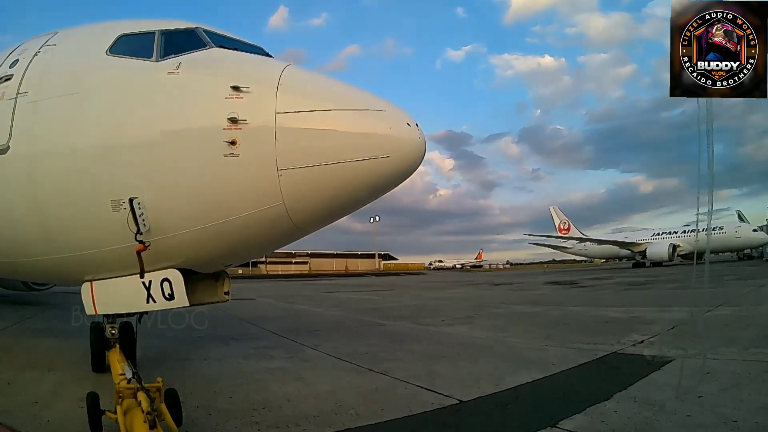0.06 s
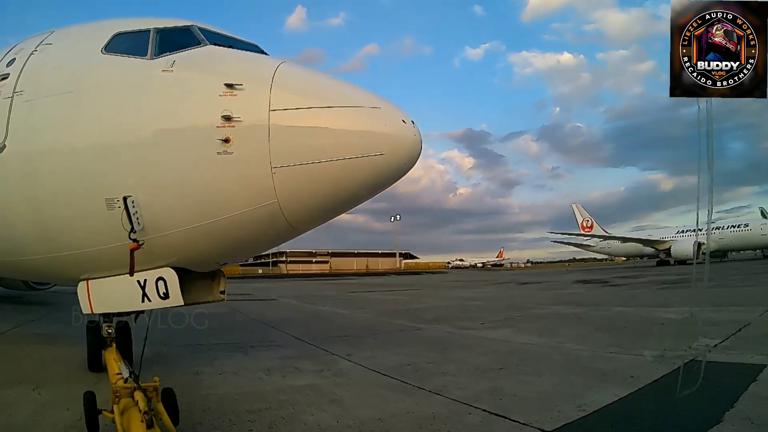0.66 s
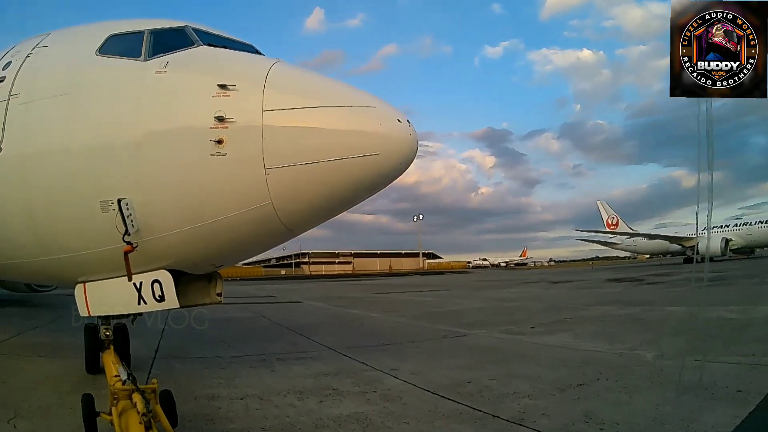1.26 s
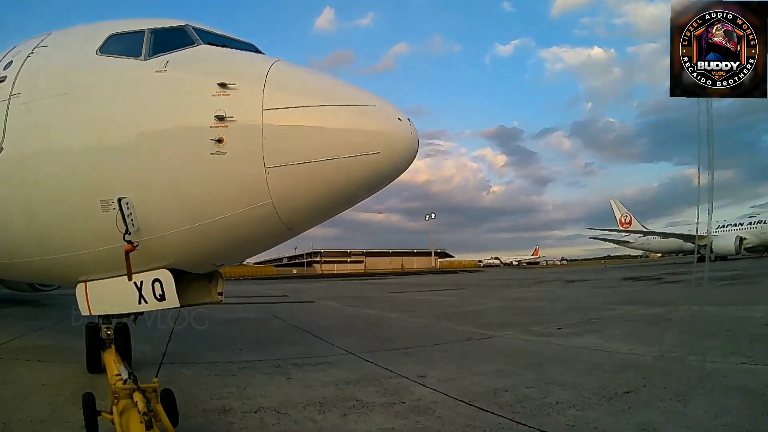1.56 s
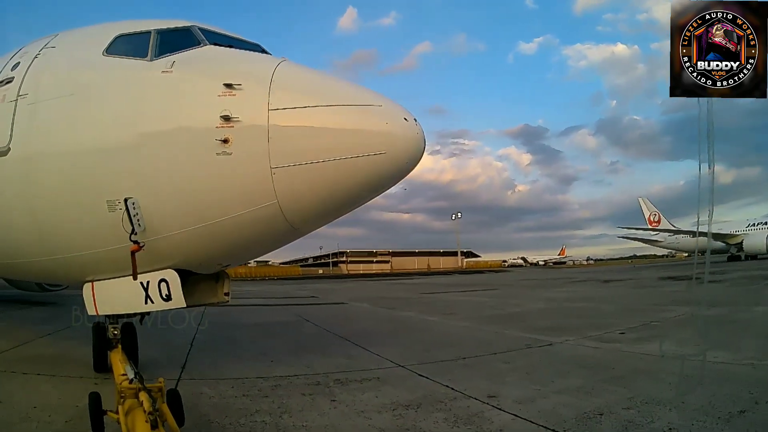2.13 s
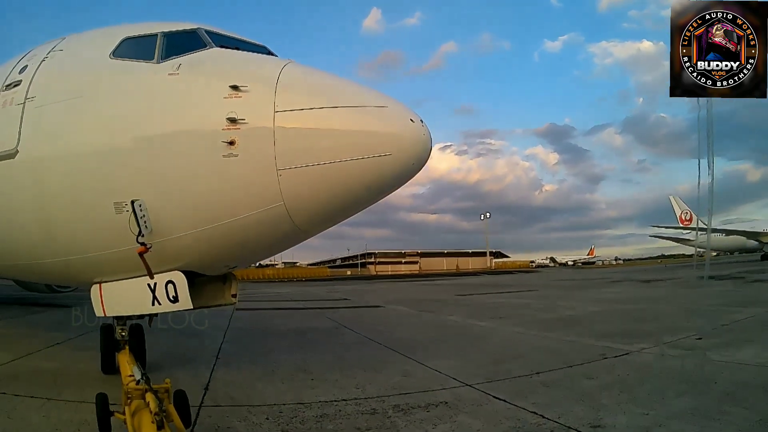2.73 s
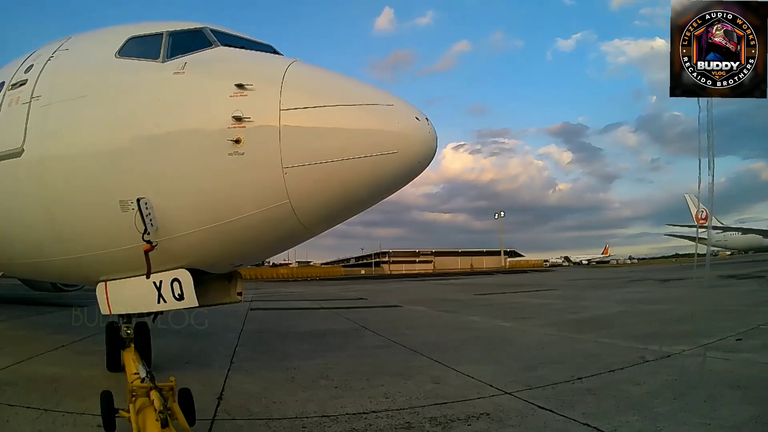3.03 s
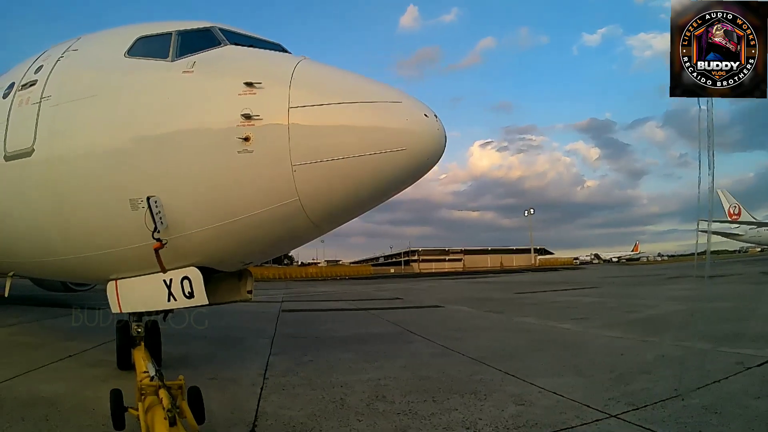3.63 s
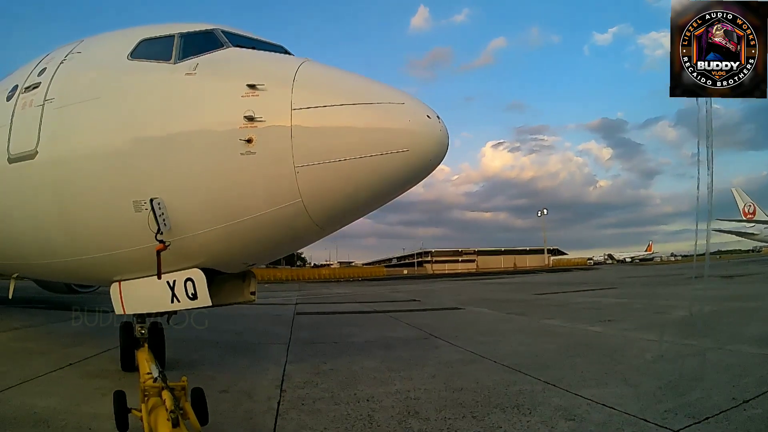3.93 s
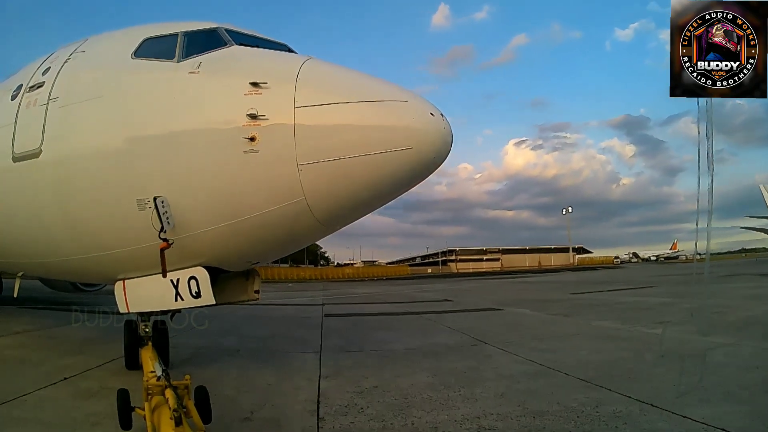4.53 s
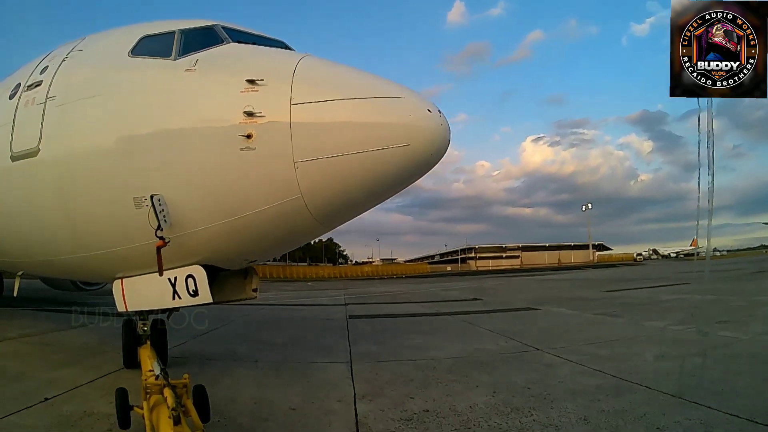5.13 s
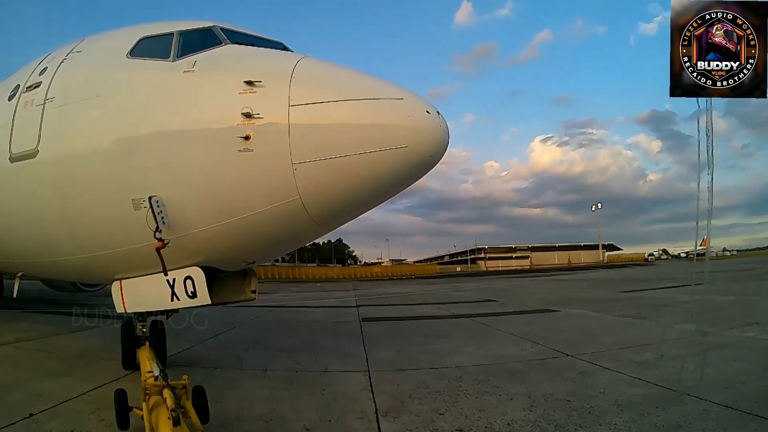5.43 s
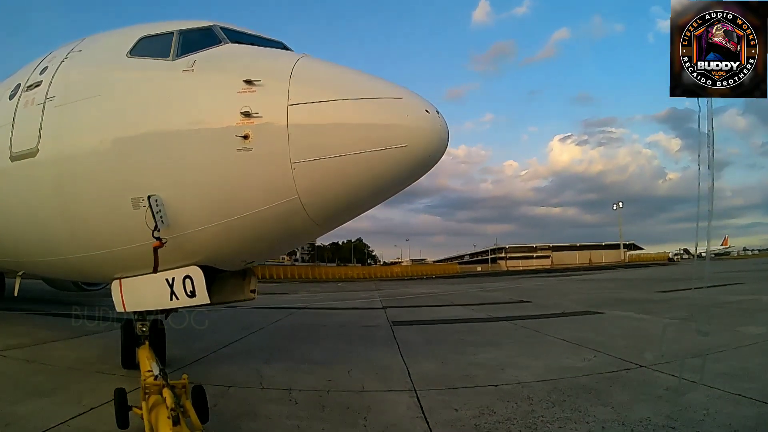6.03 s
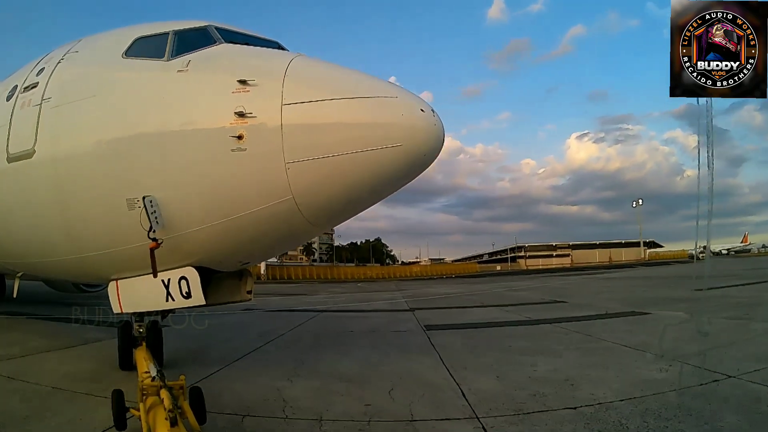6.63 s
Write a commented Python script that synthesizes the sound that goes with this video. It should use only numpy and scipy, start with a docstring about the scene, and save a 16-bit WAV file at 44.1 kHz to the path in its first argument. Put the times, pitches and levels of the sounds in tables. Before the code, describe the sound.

Heard from aboard a tug pushing back an airliner outdoors, a constant, slightly buzzing pump hum rides over a low diesel drone and engine rattle. The towbar gives one short squeak early on, then several soft hydraulic hisses come and go around the middle. The rolling rumble swells briefly now and then, while an even rush of airport noise and a faint, thin turbine whine continue throughout.

```python
"""On an airport apron, a diesel tug pushes an airliner back with a towbar, heard from the tug itself.
The engine's firings drone and rattle its block, the pump's pistons hum on a wavering pitch, and the
heavy frame rocks and rumbles. Oil hisses through the steering valve in short spells, and the towbar
squeals once as its joint slips. Behind it all, a turbine whines thinly over a broad wash of noise."""
import sys
import numpy as np
from scipy import signal
from scipy.fft import rfft, irfft
from scipy.io import wavfile
from scipy.ndimage import uniform_filter1d

SR = 44100
rng = np.random.default_rng(int(sys.argv[2]) if len(sys.argv) > 2 else 0)


def wav_out(sig):
    """Save sig, one row per channel (or a flat mono array), as 16-bit PCM at SR to the path in sys.argv[1]."""
    wavfile.write(sys.argv[1], SR, np.round(np.clip(np.atleast_2d(sig).T, -1, 1) * 32767).astype(np.int16))


N = 298538
TIME = np.arange(N) / SR
HZ = np.maximum(np.arange(N // 2 + 1) * SR / N, 1e-3)  # the frequencies of a spectrum


def undb(db):
    """Turn decibels into a number to multiply by."""
    return 10 ** (np.asarray(db) / 20)


def level(x, db):
    """Set a sound's average (rms) level."""
    return x * undb(db) / np.sqrt(np.mean(x ** 2))


def curves(table):
    """Join each column's points by straight lines over time."""
    times, *columns = np.transpose(table)
    return [np.interp(TIME, times, column) for column in columns]


def noise():
    """White noise, an even hiss."""
    return rng.standard_normal(N)


def wander(rate):
    """A random wobble of typical size 1, changing about rate times a second."""
    return level(irfft(rfft(noise()) / (1 + (HZ / rate) ** 4), N), 0)


def ring(x, modes):
    """Make a sound ring in narrow bands: (pitch [Hz], width [Hz], gain [dB])."""
    power = sum(undb(db) ** 2 / (1 + ((HZ ** 2 - hz ** 2) / (1.27 * HZ * width)) ** 2) ** 2
                for hz, width, db in modes)
    return irfft(rfft(x) * np.sqrt(power), N)


def colour(x, points):
    """Shape a sound by (frequency [Hz], gain [dB]) points, fading out below the first."""
    hz, db = np.transpose(points)
    gain = undb(np.interp(np.log(HZ), np.log(hz), db)) / (1 + (hz[0] / HZ) ** 4)
    return irfft(rfft(x) * gain, N)


def count_cycles(hz):
    """Count the cycles of a changing pitch, from a random start."""
    return np.cumsum(hz) / SR + rng.random()


def tone(cycles, db):
    """A pure tone at an average (rms) level."""
    return np.sqrt(2) * undb(db) * np.sin(2 * np.pi * cycles)


def spell(start, end, rise, fall):
    """Fade in around start and out around end, all in seconds."""
    return np.clip(.5 + (TIME - start) / rise, 0, 1) * np.clip(.5 + (end - TIME) / fall, 0, 1)


def engine(firing_hz=67.1, knock_depth=0.16, flutter_db=0.8, drift_db=0.5):
    """Firings make a low drone and rattle the engine block, while the cab and exhaust boom."""
    # tones of the drone: (multiple of the firing rate, level [dB])
    harmonics = [(1, -45), (2, -53)]
    # ringing of the block and its covers: (pitch [Hz], width [Hz], relative level [dB])
    block_modes = [(733.4, 25.4, 5.5), (835, 19, -2), (904, 21, -2.5), (994, 17, -6.5), (1335, 77, -0.5),
                   (1463, 110, 1), (1565, 142, 0), (1700, 71, -13), (1847, 117, -7), (2020, 170, -17.5)]
    # the clatter, harder under load: (time [s], level [dB])
    clatter_levels = [(0, -48.5), (1.0, -49), (2.5, -50), (3.5, -48), (4.2, -48.5), (5.1, -49.5),
                      (6.77, -49.5)]
    # boom of cab and exhaust: (pitch [Hz], width [Hz], relative level [dB])
    boom_modes = [(69, 13.6, -0.5), (116, 40, -8), (151.5, 12.6, -1), (204, 32, -11.5), (242.7, 41.6, -6)]
    cycles = count_cycles(firing_hz * (1 + .002 * wander(3 * .31)))
    drone = sum(tone(round(multiple) * cycles, db + 2.3 * wander(3.0)) for multiple, db in harmonics)
    knocks = noise() * (1 + knock_depth * np.cos(2 * np.pi * cycles)) * undb(flutter_db * wander(30))
    clatter_db, = curves(clatter_levels)
    clatter = level(ring(knocks, block_modes), 0) * undb(clatter_db + drift_db * wander(1.5))
    boom = level(ring(noise(), boom_modes), -47.0)
    return drone + clatter + boom


def pump(throb_hz=3.18, crest_s=0.166, throb_db=2, flutter_db=0.26, sway_db=0.2):
    """The oil pump hums at its piston rate and twice that; at three times, its housing buzzes."""
    # piston strokes, wavering with the load: (time [s], rate [Hz])
    piston_rates = [(0.0, 210.1), (0.44, 211.1), (0.6, 210.2), (1.16, 211.0), (1.44, 209.3), (2.68, 209.4),
                    (2.92, 211.1), (3.2, 208.7), (3.48, 212.1), (3.8, 210.0), (4.04, 210.9), (5.0, 210.9),
                    (5.12, 210.0), (5.56, 211.5), (5.84, 209.2), (6.12, 212.5), (6.32, 211.2),
                    (6.76, 213.1)]
    # the hum: (time [s], lower tone's level [dB], upper tone's level [dB])
    hum_levels = [(0.0, -42.5, -39.6), (1.44, -46.5, -40), (1.72, -42.5, -40.5), (2.08, -47, -42.5),
                  (2.32, -43.1, -44), (2.72, -45.4, -41.0), (2.88, -41.5, -41), (3.16, -47.1, -41.8),
                  (3.32, -43.5, -41), (4.32, -41.1, -38.4), (4.76, -43.0, -40.1), (5.08, -40, -40.9),
                  (5.28, -43.5, -40), (5.52, -40.6, -40.2), (6.44, -42.6, -39.8), (6.76, -41, -40.5)]
    # ringing of the housing: (time [s], base level [dB])
    housing_levels = [(0, -48), (2.1, -48), (3.7, -47.5), (4.2, -50), (6.77, -50)]
    hz, = curves(piston_rates)
    lower_db, upper_db = curves(hum_levels)
    throb = np.cos(2 * np.pi * throb_hz * (TIME - crest_s))
    housing_db = curves(housing_levels)[0] + throb_db * throb + wander(9)  # uneven throbs
    cycles = count_cycles(hz * (1 + 0.00048 * wander(7.9)))
    lower = tone(cycles, lower_db + sway_db * wander(3.2) + flutter_db * wander(18))
    upper = tone(2 * cycles, upper_db + 0.47 * wander(21))
    buzz = tone(3 * cycles + 0.26 * wander(7.2), -2.8 + 0.9 * wander(24))
    rattle = level(ring(noise(), [(628.5, 53, 0)]), -4.0)
    return lower + upper + (buzz + rattle) * undb(housing_db)


def chassis(rumble_db=-48.5, surge_half_s=0.064):
    """The heavy frame rocks on its tyres and rumbles as it rolls, with a surge now and then."""
    # slow rocking: (rate [Hz], width [Hz], relative level [dB])
    rocking_modes = [(12.65, 2.36, 5), (21.8, 5.7, -8.5)]
    # the rumble surges as the frame heaves: (time [s], level [dB])
    surges = [(0.94, -34), (2.0, -46), (2.7, -40.5), (3.51, -39), (3.79, -43), (4.58, -48), (5.9, -39.5)]
    rocking = level(ring(noise(), rocking_modes), -37)
    rumble = ring(noise(), [(49.4, 8.7, 0)])
    rumble /= np.sqrt(uniform_filter1d(rumble ** 2, int(.25 * SR)))  # even out chance swells
    surge_power = sum(undb(db) ** 2 * np.exp(-((TIME - at) / surge_half_s) ** 2) for at, db in surges)
    return rocking + rumble * np.sqrt(undb(rumble_db) ** 2 + surge_power)


def drives():
    """Belt drives and the generator hold a nearly steady pitch and waver a little in level."""
    # their tones: (pitch [Hz], level [dB])
    tones = [(52, -49), (75, -53.5), (137.6, -55.5), (804.7, -62.5), (1609.4, -60.5)]
    return sum(tone(count_cycles(hz * (1 + 0.000574 * wander(2.0))), db + 1.9 * wander(1.4))
               for hz, db in tones)


def steering(leak_db=-83.5, pipes_rest_db=-67, pipes_vs_jet_db=-11.5, flutter_db=1.3):
    """Oil always sings faintly in the pipes, and hisses through the valve when the wheel is turned."""
    # turns of the wheel: (start [s], end [s], level [dB], swell over the turn [dB])
    wheel_turns = [(0.0, 1.45, -72, 2), (1.984, 2.239, -58, -3), (2.99, 3.33, -62, 3), (3.46, 3.88, -63, 1),
                   (3.882, 4.07, -59.5, -2.5)]
    # oil pipes ringing with the flow: (pitch [Hz], width [Hz], relative level [dB])
    pipe_modes = [(3110, 160, 2.5), (3350, 200, -0.5), (3670, 150, -2.5), (4426, 270, 0.5),
                  (5100, 430, -16), (5400, 75, -18)]
    # jet of oil at the valve opening: (pitch [Hz], width [Hz], relative level [dB])
    jet_bands = [(3110, 190, 3), (3340, 1100, -6), (4520, 230, 5.5), (5020, 300, 1.5), (5490, 80, 6),
                 (6100, 1000, -6), (7550, 1400, -13), (10400, 3400, -17.5), (2190, 500, -2.5)]
    flow = undb(leak_db) + sum(valve_flow(*turn) for turn in wheel_turns)
    pipe_gain = np.hypot(undb(pipes_rest_db), undb(pipes_vs_jet_db) * flow)
    pipes = level(ring(noise(), pipe_modes), 0) * pipe_gain
    jet = level(ring(noise(), jet_bands), 0) * flow
    return (pipes + jet) * undb(flutter_db * wander(27))


def valve_flow(start, end, db, swell_db, open_s=0.058, close_s=0.037):
    """Strength of the hiss over one turn: it swells or fades, then spits as the gap narrows to shut."""
    spit_db, spit_lead_s, spit_half_s = 2.5, 0.025, 0.015
    swell = swell_db * np.interp(TIME, [start, end], [-.5, .5])
    spit = spit_db * np.exp(-((TIME - end + spit_lead_s) / spit_half_s) ** 2)
    return spell(start, end, open_s, close_s) * undb(db + swell + spit)


def towbar(start_s=0.41, end_s=0.6, squeal_db=-49.5):
    """The joint rubs and squeals once, its pitch sagging as it slips and rising again as it grips."""
    # faint rubs, a tick and a low shudder as the load shifts:
    # (start [s], end [s], pitch [Hz], width [Hz], level [dB], fade [s])
    rub_spells = [(.08, .4, 6640, 2200, -73, .06), (.17, 0.198, 5000, 1500, -66, .01),
                  (0.34, 0.36, 4260, 400, -60.5, .01), (.42, .49, 7450, 1200, -70, 0.034),
                  (1.303, 1.311, 6200, 1700, -65, .004), (5.052, 5.17, 139.8, 110, -42, 0.087)]
    lowest_hz, lowest_at_s, bend_hz_per_s2 = 1430, 0.515, 11000
    squeal_hz = lowest_hz + bend_hz_per_s2 * (np.clip(TIME, start_s, end_s) - lowest_at_s) ** 2
    cycles = count_cycles(squeal_hz * (1 + 0.012 * wander(60)))
    squeal = tone(cycles, squeal_db + 4.9 * wander(50)) * spell(start_s, end_s, .02, .02)
    rubs = sum(level(ring(noise(), [(hz, width, 0)]), db) * spell(start, end, fade, fade)
               for start, end, hz, width, db, fade in rub_spells)
    return squeal + rubs


def apron(swell_db=0.55, flicker_db=0.78):
    """A broad wash of noise whose treble swells and flickers, and the thin whine of a turbine."""
    # wash of engine, tyres and apron: (frequency [Hz], relative level [dB])
    wash_shape = [(25, 3.5), (90, -5.5), (180, -10.5), (300, -14), (440, -9), (510, -14), (570, -5.5),
                  (800, -17.5), (1200, -17), (1900, -22.5), (2700, -33), (4000, -35), (5800, -37),
                  (8500, -44), (15500, -45.5)]
    # turbine whine: (pitch [Hz], width [Hz], relative level [dB])
    turbine_bands = [(10335, 85, 2), (10400, 100, -7), (10470, 810, -5)]
    wash = level(colour(noise(), wash_shape), -46.0)
    treble = signal.sosfilt(signal.butter(1, 2500, "high", fs=SR, output="sos"), wash)
    whine = level(ring(noise(), turbine_bands), -77.5) * undb(2.2 * wander(2.6))
    treble_gain = undb(swell_db * wander(1.5) + flicker_db * wander(22))
    return wash - treble + treble * treble_gain + whine


def scene():
    """Everything heard on the tug, added into one channel."""
    return (engine() + drives() + chassis() + pump() + steering() + towbar() + apron())[None]


def record(dry):
    """Cut away the very highest treble."""
    top_hz = 15250
    return signal.sosfilt(signal.ellip(10, .1, 80, top_hz, fs=SR, output="sos"), dry)


dry = scene()
out = record(dry)
wav_out(out)
```